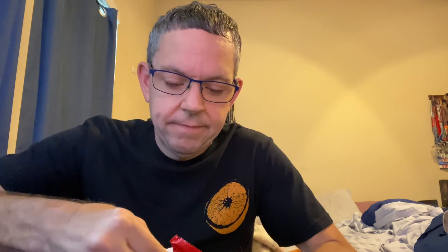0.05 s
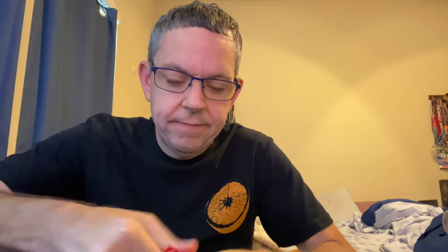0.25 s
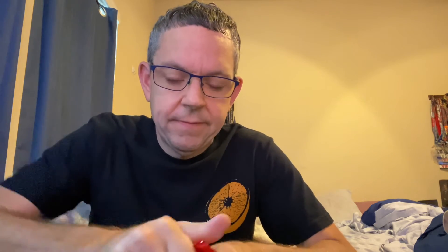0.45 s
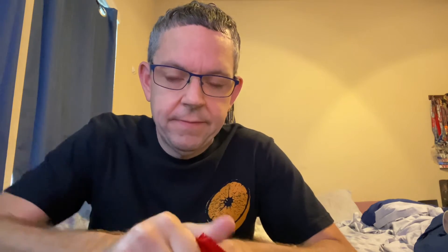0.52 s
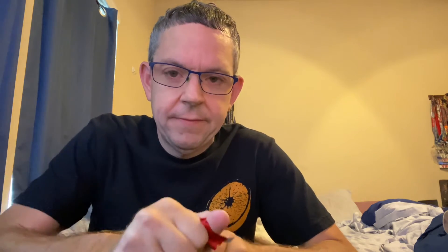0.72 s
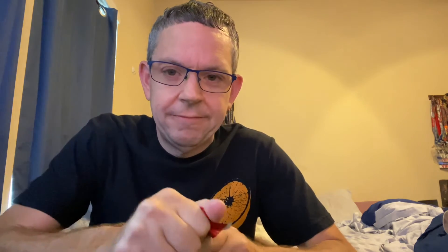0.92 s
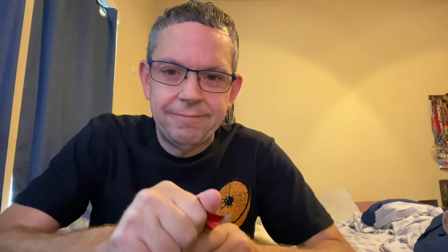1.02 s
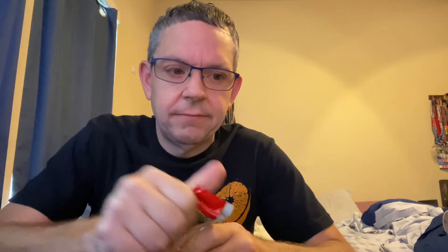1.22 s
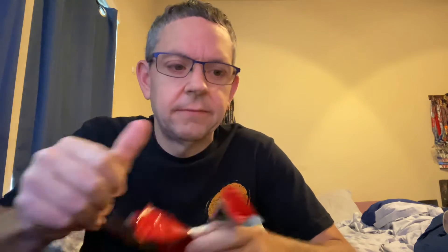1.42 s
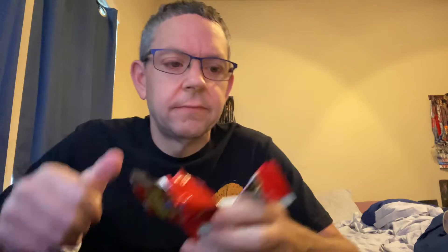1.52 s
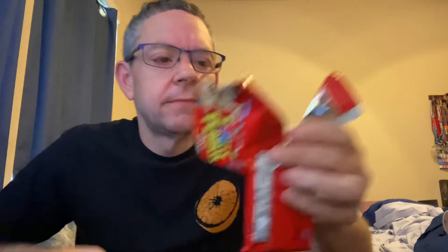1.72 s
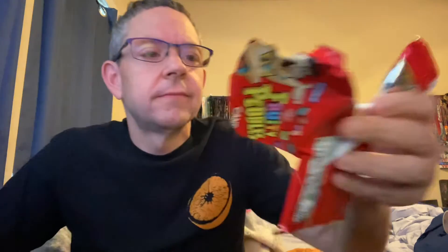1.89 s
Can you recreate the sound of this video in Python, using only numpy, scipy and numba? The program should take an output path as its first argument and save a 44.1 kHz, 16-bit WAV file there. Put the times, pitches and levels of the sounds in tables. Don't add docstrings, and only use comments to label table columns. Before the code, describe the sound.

A thin foil-plastic wrapper crackles in the hands, half a metre away. Near-quiet rumble first, then a sharp, rapid tear with a dull knock at 0.23-0.26 s. Crisp creases snap around 0.46 and 0.56, a cluster with a knock at 0.86, another at 0.95, strong snaps and bumps at 1.19-1.25. Sparse crinkles follow, a faint bright tear near 1.68, light ticks to 2 s. Short dull bedroom tail, faint fan hum.

```python
import sys
import numpy as np
from scipy import signal
from scipy.fft import rfft, irfft
from scipy.io import wavfile
from scipy.ndimage import uniform_filter1d
from numba import njit

SR = 44100
rng = np.random.default_rng(int(sys.argv[2]) if len(sys.argv) > 2 else 0)


def transcribe(u):
    v = np.clip(np.atleast_2d(u).T, -1, 1)
    q = np.round(v * 32767).astype(np.int16)
    wavfile.write(sys.argv[1], SR, q)


def field_ratio(decibels):
    return 10 ** (np.asarray(decibels, dtype=float) / 20)


N = 85995
FREQ = np.maximum(np.fft.rfftfreq(2 * N, 1 / SR), 1)


def curve(table):
    table = np.array(table)
    return np.interp(np.log(FREQ), np.log(table[:, 0]), table[:, 1])


def shape(x, gain):
    return irfft(rfft(x, 2 * N) * gain, 2 * N)[..., :N]


def level(x, db):
    return x * field_ratio(db) / np.sqrt(np.mean(x ** 2))


def noise_through(gain, size=(2, N)):
    return shape(rng.standard_normal(size), gain)


@njit
def rings(start_s, hz, cycles, size, turn, n):
    y = np.zeros(n)
    for k in range(len(start_s)):
        first = int(start_s[k] * SR)
        last = min(n, first + int(7 * cycles[k] * SR / hz[k]))
        rotate = np.exp((2j * np.pi - 1 / cycles[k]) * hz[k] / SR)
        ring = 2.6 * size[k] * np.exp(2j * np.pi * turn[k])
        unrisen, rise = 1., np.exp(-2 / cycles[k] * hz[k] / SR)
        for j in range(max(first, 0), last):
            y[j] += ring.imag * (1 - unrisen)
            unrisen *= rise
            ring *= rotate
    return y


def air():
    # freq_hz, density_db
    rumble = [(22, -58), (45, 8.5), (75, 1.5), (100, -4), (300, -13), (600, -23), (2000, -40.5),
              (7000, -50), (14000, -66)]
    # freq_hz, width_hz, level_db
    resonances = [(49.7, 5.1, -51.5), (68.6, 6.3, -54.5), (148, 8.4, -62.5)]
    # freq_hz, level_db
    fan_lines = [(119, -62), (277, -61.5)]
    # time_s, level_db
    gusts = [(0.0, -35), (0.086, -57.5), (0.118, -63.5), (0.248, -49.5), (1.124, -47.5), (1.146, -55.5),
             (1.33, -40.5), (1.362, -56), (1.422, -42), (1.586, -55.5), (1.938, -51.5), (1.95, -48)]
    gust_top_hz, gust_mean_db = 95, -48
    fan_drift, fan_waver_db, swell_db = .006, 1.5, 1

    out = level(noise_through(field_ratio(curve(rumble))), -46)
    for hz, width_hz, db in resonances:
        out = out + level(noise_through(1 / (1 + (2 * (FREQ - hz) / width_hz) ** 2)), db)
    swell = level(noise_through(1 / (1 + (FREQ / 3) ** 2), N), 0)
    gust_db = np.interp(np.arange(N) / SR, *np.array(gusts).T)
    bass = shape(out, 1 / (1 + (FREQ / gust_top_hz) ** 4))
    out = out + bass * (field_ratio(gust_db - gust_mean_db) - 1)
    drift, waver = level(noise_through(1 / (1 + FREQ ** 2)), 0)
    warped_s = np.cumsum(1 + fan_drift * drift) / SR
    for hz, db in fan_lines:
        out = out + np.sqrt(2) * field_ratio(db + fan_waver_db * waver) * np.sin(2 * np.pi * hz * warped_s)
    return out * field_ratio(swell_db * swell)


def room(x):
    early_db, early_t60_s = -6, .012
    late_db, late_t60_s, top_t60_s, split_hz = -2, .2, .094, 7540
    wall_s, rise_s = .006, .01
    t = np.arange(SR // 2) / SR

    def fade(t60_s):
        return np.exp(-np.log(1000) * t / t60_s) / np.sqrt(t60_s * SR / (2 * np.log(1000)))

    late = np.clip((t - wall_s) / rise_s, 0, 1)
    fades = np.array([late * fade(late_t60_s), late * fade(top_t60_s), fade(early_t60_s)])
    low, top, early = rfft(rng.standard_normal((3, 2, len(t))) * fades[:, None], 2 * N)
    dull = 1 / np.sqrt(1 + (FREQ / split_hz) ** 4)
    walls = low * dull + top * (1 - dull) / 2
    return shape(x, field_ratio(late_db) * walls + field_ratio(early_db) * early)


def knocks(count=10):
    # start_s, level_db, pitch_hz, decay_cycles
    hits = [(0.00212, -51, 4500, 20), (.257, -30.5, 643, 3.04), (.26, -29.5, 518, 3.61),
            (0.77, -41.5, 1504, 17), (1.226, -27.5, 1045, 2.14), (1.194, -28, 1530, 4.24),
            (.861, -19.5, 1572, 4.1), (1.9, -45, 3100, 3.6), (1.227, -25.5, 495, 2.02),
            (1.325, -38.5, 1907, 22), (1.2, -47, 2300, 11), (0.12, -47, 3500, 3.7)]
    s, db, hz, cycles = np.repeat(np.array(hits), count, axis=0).T
    u = rng.random((len(s), 3)).T
    spread = (np.arange(len(s)) % count + u[1]) / count - .5
    return rings(s + cycles / hz * u[0], hz * (1 + .5 * spread), cycles / 2, field_ratio(db - 16.5), u[2], N)


def film(s, db, low_db, high_db, u, count):
    knot_hz = (800, 1700, 3400, 7600, 10500, 13000)
    mean_cycles = 3
    low_late_cycles = .81
    pitch = (np.arange(len(s)) % count + u[0]) / count
    hz = 650 * (15800 / 650) ** (pitch ** .6)
    place = np.interp(np.log(hz), np.log(knot_hz), np.arange(6))
    knots_db = np.array([low_db - 12, low_db, low_db / 2, 0 * db, high_db, high_db - 6])
    below = np.minimum(place.astype(int), 4)

    def pick(k):
        return np.take_along_axis(knots_db, k[None], axis=0)[0]

    colour_db = pick(below) + (place - below) * (pick(below + 1) - pick(below))
    s = s + low_late_cycles * u[1] / hz
    cycles, size = mean_cycles * (.5 + u[1]), field_ratio(db + colour_db)
    return np.array([rings(s, hz, cycles, size, turn, N) for turn in (u[2], u[2] + 20 * u[0])])


def crackle(count=2500, size=5):
    # time_s, level_db, brightness_db
    grip = [(0, -47, -15), (0.065, -99.5, -14), (0.204, -68.5, -10), (0.235, -46, -5), (.39, -61, -0.5),
            (.526, -61, -4.5), (.656, -57, 3), (.846, -73, -21), (.9, -55, -0.5), (1.036, -72, -10),
            (1.238, -53.5, 5.5), (1.33, -64.5, -8), (1.48, -62, 16), (1.549, -71.5, 6), (1.61, -60.5, 8),
            (1.68, -55, 3), (1.754, -76, 6), (1.95, -54, 8)]
    base_db, tail_db, low_db = -4, 3.7, -6
    time_s, grip_db, bright_db = np.array(grip).T
    u = rng.random((count, 2)).T
    s = np.repeat(u[0] * N / SR, size)
    louder = -np.repeat(np.log(1 - u[1]), size)
    db = np.interp(s, time_s, grip_db) + base_db + tail_db * louder
    high_db = np.minimum(np.interp(s, time_s, bright_db) + 6, 10)
    return film(s, db, low_db + 0 * s, high_db, rng.random((count * size, 3)).T, size)


def snaps(count=50):
    # start_s, level_db, low_db, high_db
    creases = [(0.1092, -54.5, -3, -17), (0.127, -66, -20, 3), (0.146, -58, -13, -17),
               (0.3501, -32.5, -30, 4), (0.4298, -36.5, -16.5, -1.5), (0.4578, -20, -20, -11.5),
               (0.46, -25.5, -16, -9.5), (0.469, -50, 6, -17), (0.521, -32.5, -18.5, -19),
               (0.5626, -30, -17.5, -8.5), (0.5858, -36, -8, -3), (0.6379, -30.5, -31, -6),
               (0.6685, -32, -24, -3.5), (0.7083, -44.5, -4, -9), (0.7755, -45, -14, -7.5),
               (0.8643, -21, -18.5, -7.5), (0.8608, -25, -7.5, -14), (0.8735, -38.5, 4, -6),
               (0.8765, -42.5, 5, -15), (0.8682, -36, -5, 0), (0.883, -33.5, -17, 5.5),
               (0.9224, -60, -16, 10), (0.9482, -25.5, -20, -0.5), (1.0104, -49, -20, -24),
               (1.0565, -32.5, -37.5, 0.5), (1.0789, -71, -18, -12),
               (1.1155, -41, -16, -12), (1.1336, -50, -11, 4.5), (1.1553, -24.5, -24, -12.5),
                    (1.164, -34, -23, -12), (1.1938, -29.5, -6.5, -3.5), (1.2256, -21.5, -19, -3.5),
                    (1.2275, -18, -28, -9.5), (1.24, -38, -13, -5), (1.2545, -39, -9, -7),
                    (1.2474, -31.5, -12.5, -28), (1.2994, -53, 8.5, -21), (1.351, -57.5, -27, 9),
                    (1.451, -39, -24, 3), (1.3857, -55, -9, -17), (1.4037, -52, -7, -2),
                    (1.4364, -31, -16, -19), (1.4629, -32, -28, -15), (1.4949, -41, -23, -45),
                    (1.5905, -42, -20.5, -19), (1.5925, -43, -15, 3.5), (1.595, -44, -14.5, -20),
                    (1.6037, -43.5, -10.5, -18), (1.6127, -59.5, 7, 26.5), (1.7055, -29, -13.5, -10),
                    (1.688, -26.5, -14.5, -4), (1.6925, -40, -3, -4), (1.666, -57, -8, 1),
                    (1.695, -37.5, -10, -7), (1.709, -51, -27, -8), (1.7198, -41, -10.5, -15),
                    (1.7798, -37, -20, -4), (1.8041, -44, -18, -2), (1.9145, -35, -14, -5)]
    # start_s, level_db, low_db, high_db
    first_tear = [(.2312, -21.5, -35, -21), (0.235, -21.5, -19.5, -14), (.238, -14, -19.5, -10.5),
                  (0.2403, -19.5, -18.5, -7), (0.244, -16, -22.5, -9), (0.2464, -15, -22, -11),
                  (0.2486, -20.5, -34, -2.5), (0.2513, -16, -24, -8), (0.2528, -13.5, -28, -16),
                  (.254, -19, -29, -1), (.255, -14.5, -40, -5.5), (0.2566, -10.5, -28, -8.5),
                  (0.2562, -16.5, -20, -10), (.259, -23, -20, -10)]
    # start_s, level_db, low_db, high_db
    second_tear = [
        (1.673, -45, -17, 6),
        (1.6769, -46, -15, 14),
        (1.679, -53.5, -21, 21),
        (1.6808, -43, -9, 14),
        (1.6842, -51, -16, 16),
        (1.6842, -42, -24, 16.9),
        (1.6848, -46, -3, 15),
        (1.691, -57, -21, 6),
    ]
    tear_offset = [0, 1.5, -2, 5]  # s, dB, low dB, high dB
    spread_s, scatter_db = .0009, 6
    tears = np.vstack([first_tear, second_tear]) + np.array(tear_offset)
    events = np.vstack([creases, tears])
    s, db, low_db, high_db = np.repeat(events, count, axis=0).T
    u = rng.random((len(s), 5)).T
    late = -np.log(1 - u[3]) * u[3]
    db = db - 13.5 - 2 * late + scatter_db * (2 * u[4] - 1)
    return film(s + spread_s * late, db, low_db + 9, high_db + 9, u, count)


def ports(direct, diffuse, share, flip_hz):
    # freq_hz, share
    likeness = [(60, 0.95), (150, 0.7), (400, 0.12), (800, 0.035), (2500, 0.17), (6000, 0.036)]
    # freq_hz, level_db
    balance = [(60, 2.5), (140, 1.5), (250, -2), (700, -3), (2400, -1)]
    # freq_hz, width_hz
    flips = [(7700, 2200), (10450, 1500), (13500, 900)]
    lag_s, bass_hz, shared_hz = .000155, 900, 6200
    fold_side = .35

    shared = np.clip((FREQ - shared_hz) / 1000, 0, 1)
    like = np.maximum(np.clip(curve(likeness), .05, 1), share * shared)
    other = shape(diffuse[0], like) + shape(diffuse[1], np.sqrt(1 - like ** 2))
    fold_like = like ** fold_side
    beside = shape(direct[0], fold_like) + shape(direct[1], np.sqrt(1 - fold_like ** 2))
    turns = FREQ * lag_s * FREQ ** 2 / (FREQ ** 2 + bass_hz ** 2)
    steps = 1
    for hz, width_hz in flips:
        steps = steps + np.clip(.5 + (FREQ - hz) / max(flip_hz, width_hz), 0, 1) / 2
    lead = np.exp(2j * np.pi * (turns + shared * (steps - turns)))
    lean = field_ratio(curve(balance) * (1 - shared) / 2)
    return np.array([shape(direct[0] + diffuse[0], lean), shape(beside + other, lead / lean)])


def scene():
    # start_s, end_s
    joined_spans = [(0, .345), (.375, .427), (.436, .455), (.466, .53), (.61, .635), (.68, .7), (.78, .855),
                    (.96, 1.05), (1.14, 1.153), (1.16, 1.222), (1.231, 1.34), (1.4, 1.435), (1.51, 1.585),
                    (1.725, 1.76), (1.8, 2)]
    direct = snaps() + crackle() + knocks()
    diffuse = room(direct[0]) + air()
    t = np.arange(N) / SR
    joined = uniform_filter1d(sum(1. * (t >= a) * (t < b) for a, b in joined_spans), size=256)
    return joined * ports(direct, diffuse, 1., 900) + (1 - joined) * ports(direct, diffuse, .9, 2400)


def roll_off(x):
    return signal.sosfilt(signal.butter(12, 16540, fs=SR, output="sos"), x)


def record(dry):
    # freq_hz, gain_db
    capsule = [(300, -0.5), (3000, -1.5), (5500, 0), (7000, 4), (8600, 4), (10200, -2), (13000, -0.5),
               (16000, 3)]
    top_cut = signal.ellip(8, .2, 70, 16100, fs=SR, output="sos")
    mix = shape(signal.sosfilt(top_cut, dry), field_ratio(curve(capsule)))
    return roll_off(mix)


dry = scene()
out = record(dry)
transcribe(out)
```